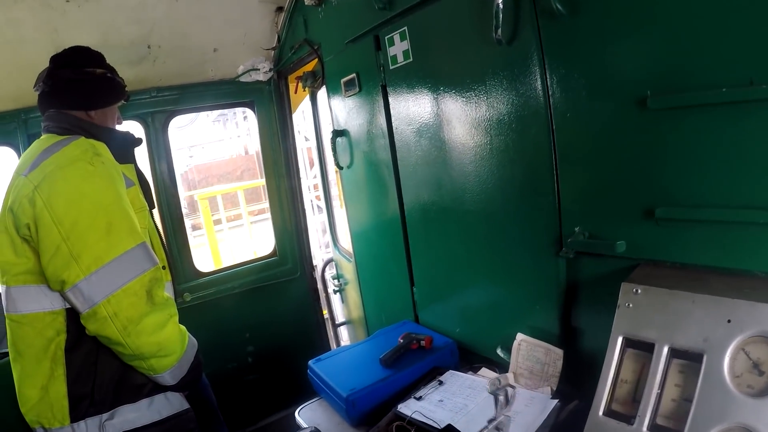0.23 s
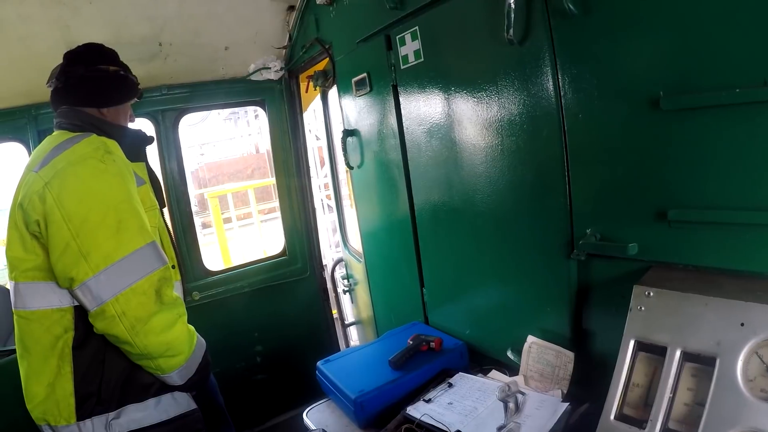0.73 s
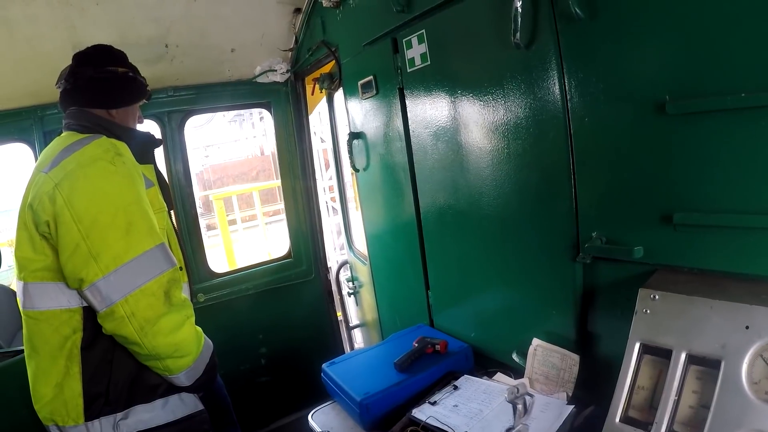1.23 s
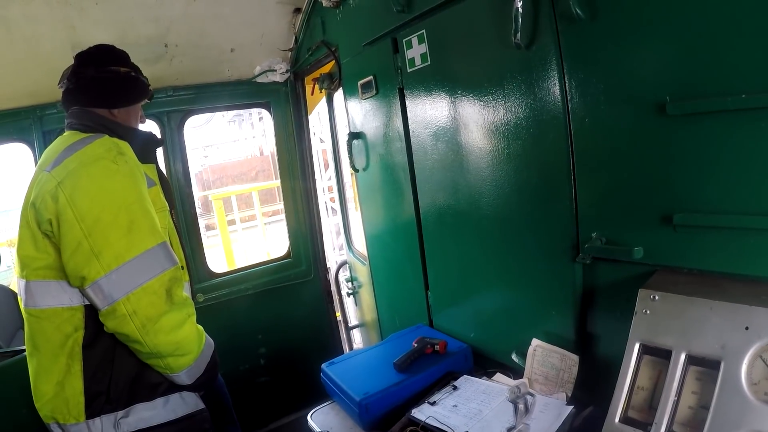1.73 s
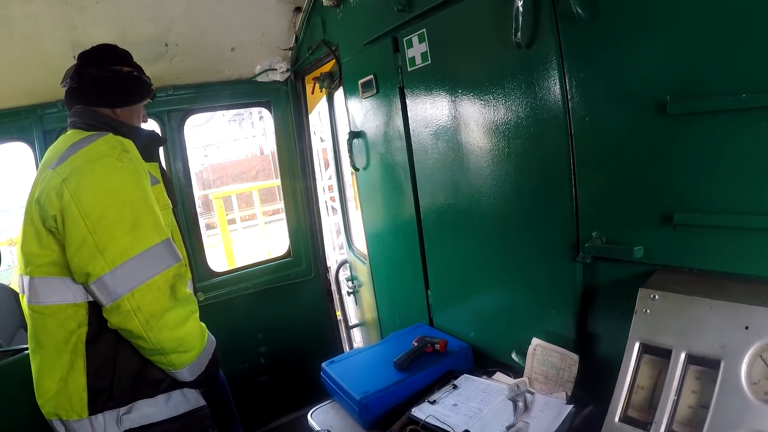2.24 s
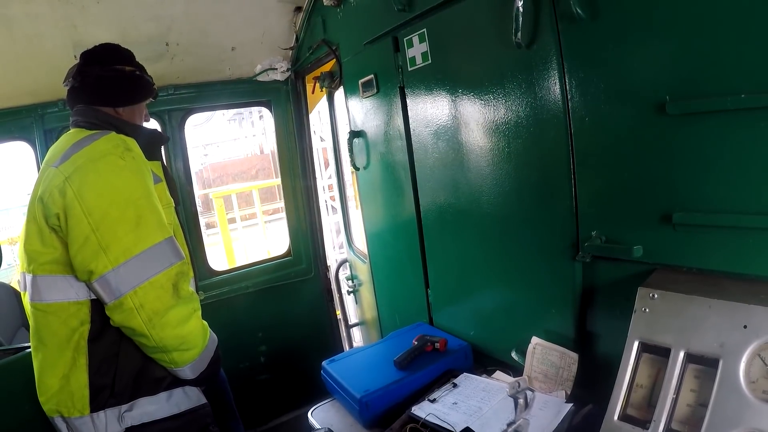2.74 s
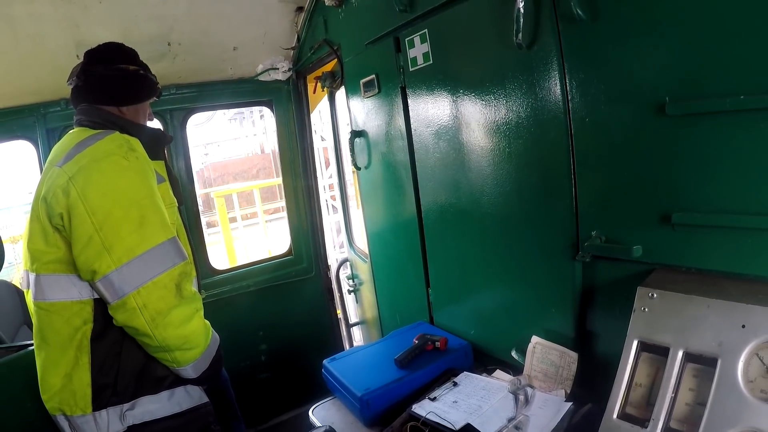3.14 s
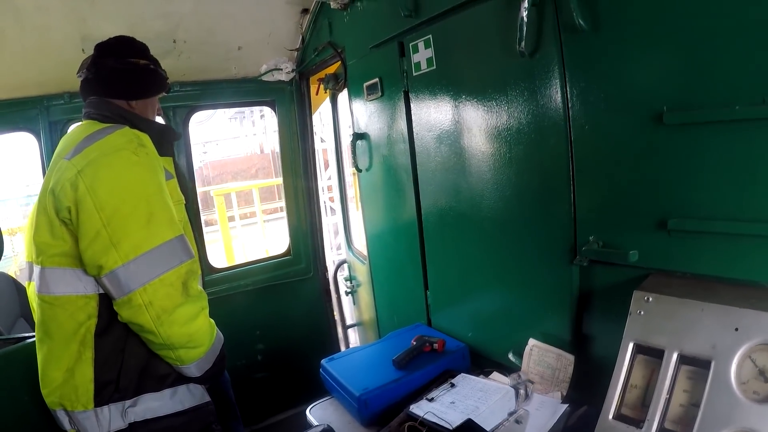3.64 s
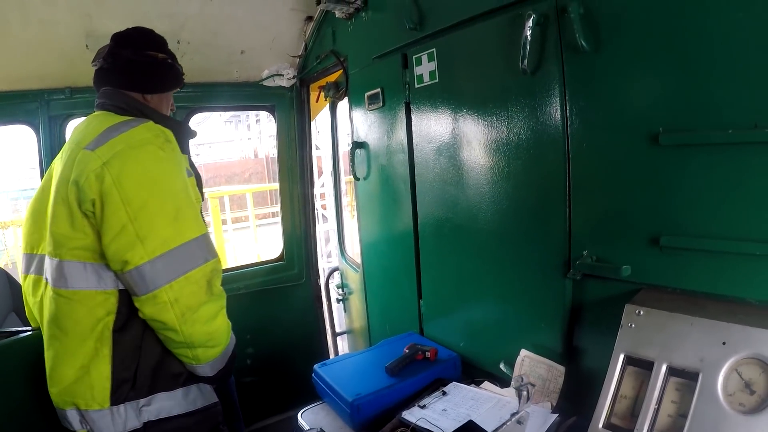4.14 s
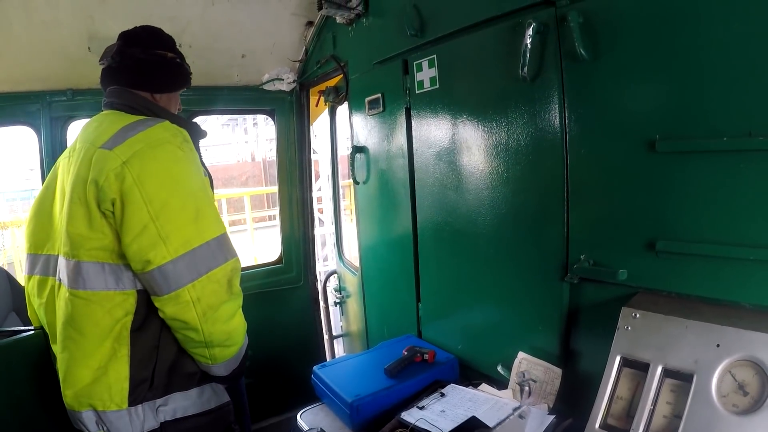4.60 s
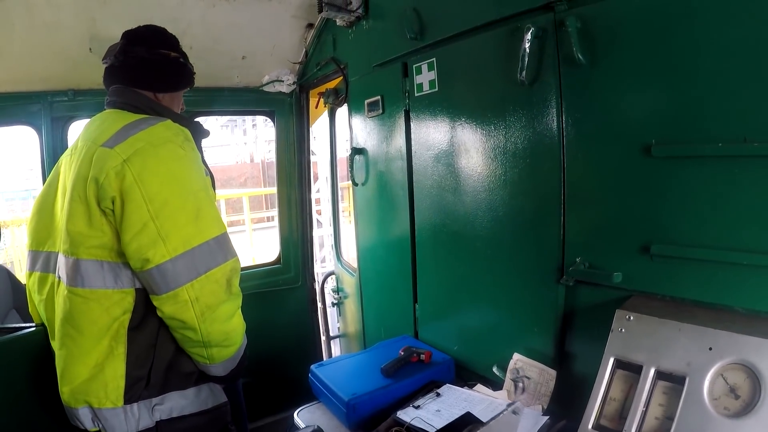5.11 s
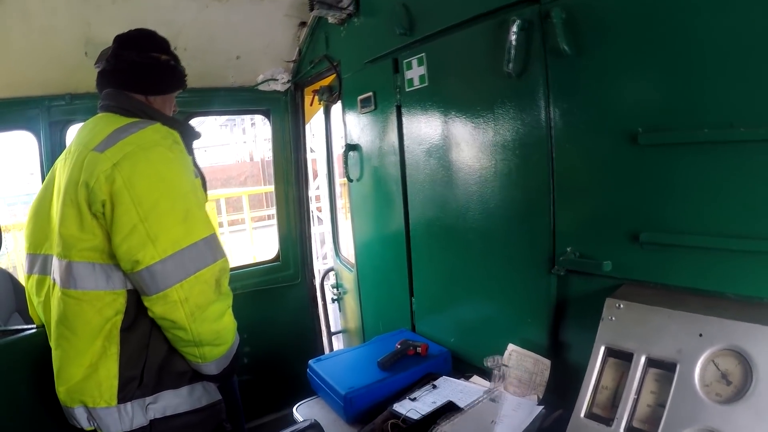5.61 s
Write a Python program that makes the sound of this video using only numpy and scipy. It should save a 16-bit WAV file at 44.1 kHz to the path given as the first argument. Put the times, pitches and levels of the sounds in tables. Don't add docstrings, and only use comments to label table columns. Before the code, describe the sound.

Inside a closed steel locomotive cab, a big diesel idles continuously with a deep, uneven throb. A faster pump pulse beats through it, valve gear clatters, and loose fittings buzz in rapid flutter over a steady hiss. Near the end come a couple of faint metal ticks and a sharper latch snap. Close, boxy stereo sound from a small camera.

```python
import sys
import numpy as np
from scipy import signal
from scipy.fft import rfft, irfft
from scipy.io import wavfile
from scipy.ndimage import uniform_filter1d

SR = 44100
rng = np.random.default_rng(int(sys.argv[2]) if len(sys.argv) > 2 else 0)


def makeup_ratio(level_db):
    decades = np.asarray(level_db, float) / 20
    return 10 ** decades


def waveform_to_disk(signal):
    frames = np.transpose(np.atleast_2d(signal))
    scaled = np.clip(frames, -1, 1) * 32767
    samples = np.round(scaled).astype(np.int16)
    wavfile.write(sys.argv[1], SR, samples)


N = 258426
T = np.arange(N) / SR
HZ = np.arange(N // 2 + 1) * SR / N + 1e-3

CYCLE_HZ = 3.1078
PUMP_HZ = 26.686


CYLINDERS = [
    (.1284, .591),
    (.2919, 1.29),
    (.4608, 1.455),
    (.636, 1.225),
    (.7933, .416),
    (.9547, .983),
]
# (frequency [Hz], width [Hz], share [ratio])
FRAME_MODES = [(20.74, 1.89, .031), (28.16, 1.95, .069), (45.01, 8.055, .9609), (45.03, 8.923, -.8808),
               (65.3, 4, .0089), (76.62, 2.07, .034), (94.6, 2, .012), (114, 7.7, .0053)]


def firing_throb(turns, count=43):
    thrust_db, mount_hz, uneven_hz = -37.5, 66, 66
    orders = {}
    for k in range(len(CYLINDERS), count):
        push = abs(sum(size * np.exp(-2j * np.pi * k * place) for place, size in CYLINDERS))
        loss = 1 + (k * CYCLE_HZ / mount_hz) ** 4
        if k % len(CYLINDERS):
            loss *= 1 + (k * CYCLE_HZ / uneven_hz) ** 12
        orders[k] = thrust_db + 20 * np.log10(push) - 10 * np.log10(loss)
    return throb(turns, CYCLE_HZ, orders, CYLINDERS, FRAME_MODES)


STROKES = [
    (.1245, -1.127),
    (.4064, -.274),
    (.6181, 1.059),
]
# (frequency [Hz], width [Hz], share [ratio])
PUMP_MODES = [(20.7, 49, .064), (299.5, 14.4, .53)]
PUMP_ORDERS = {1: -24, 2: -23, 3: -23, 4: -44, 5: -28, 6: -31, 7: -46, 9: -34, 12: -37, 13: -40}


def pump_throb():
    turns = PUMP_HZ * T + .004 * walk(1.5)
    return throb(turns, PUMP_HZ, PUMP_ORDERS, STROKES, PUMP_MODES)


GEAR_ORDERS = {13: -30, 15: -36, 21: -39, 25: -38, 60: -31, 90: -35, 100: -39, 707: -52}


def gear_lines(turns):
    return throb(turns, CYCLE_HZ, GEAR_ORDERS, CYLINDERS, FRAME_MODES)


HUM_ORDERS = {176: -40, 184: -32, 187: -41, 191: -42, 199: -36, 208: -43, 235: -47}


def bulkhead_hum(turns, depth=.9):
    swell = 1 + depth * np.cos(2 * np.pi * (turns - .47))
    return swell * throb(turns, CYCLE_HZ, HUM_ORDERS, CYLINDERS, FRAME_MODES)


def throb(turns, hz, orders, pushes, modes):
    out = 0
    for k, db in orders.items():
        line_hz = k * hz
        push = sum(size * np.exp(-2j * np.pi * k * place) for place, size in pushes)
        path = sum(share / (1 + 1j * (line_hz / f - f / line_hz) * f / width) for f, width, share in modes)
        phase = np.angle(push * path)
        out = out + np.sqrt(2) * makeup_ratio(db) * np.cos(2 * np.pi * k * turns + phase)
    return out


# (frequency [Hz], level per Hz [dB])
ROAR = [(12, -63), (25, -46), (60, -43), (130, -43), (220, -46), (340, -49), (520, -49.5), (680, -53.5),
        (900, -56), (1300, -61.5), (1600, -67), (2300, -71.5), (4200, -78.5), (14000, -125)]
# (frequency [Hz], width [Hz], level over the roar [dB])
PANELS = [(103, 7.2, -7.5), (158, 23, 5), (240.2, 22, 7), (259.7, 10.5, -8), (277.4, 5, 7.5),
          (316.6, 30, 9), (430, 27, 5), (572.5, 30, 6.5), (618, 20, 7.5), (648, 10, 3.5), (787, 20, 4),
          (1018, 12, 5.5), (1383, 87, 6), (1830, 33, 5)]


def engine_roar(turns, repeat=.4, knock=.25, swell_db=.15):
    size = int(SR / CYCLE_HZ)
    clatter = rng.standard_normal((2, size))[:, (turns % 1 * size).astype(int)]
    fresh = rng.standard_normal((2, N))
    noise = np.sqrt(repeat) * clatter + np.sqrt(1 - repeat) * fresh

    place, strength = np.transpose(CYLINDERS)
    cycles = np.arange(20)[:, None]
    scatter_db = 1.5 * rng.standard_normal((len(cycles), len(place)))
    knock_db = 20 * np.log10(strength) + scatter_db
    knocks = bursts(turns, (cycles + place - .1).ravel(), knock_db.ravel(), .003, .02)
    gate = 1 + knock * knocks
    noise = noise * gate / np.sqrt(np.mean(gate ** 2)) * makeup_ratio(swell_db * walk(2.45))

    rings = sum(db / (1 + (2 * (HZ - hz) / width) ** 2) for hz, width, db in PANELS)
    return ports(*noise, curve(ROAR, 1) + rings + 10 * np.log10(SR / 2))


# (frequency [Hz], level per Hz [dB])
BUZZ = [(1500, -72), (2500, -78), (3500, -74.5), (4300, -80), (5300, -75), (6700, -71.5), (7700, -73),
        (8100, -79), (8800, -81.5), (10200, -85.5), (11000, -94.5), (12600, -95), (13300, -99),
        (14200, -106)]


def fittings_buzz(turns, still=.95, pump_db=4.8, sway_db=2.2, scatter_db=.6, grit_db=.9):
    places = (np.arange(120) + .72) / 6
    when = np.interp(places, turns, T)
    db = pump_db * np.cos(2 * np.pi * (PUMP_HZ * when - .08))
    db = db + sway_db * np.cos(2 * np.pi * (1.88 * when + .12))
    db = db + scatter_db * rng.standard_normal(len(places))
    gate = still + bursts(turns, places, db, .015, .016)
    gate = gate * makeup_ratio(grit_db * walk(300.))
    noise = rng.standard_normal((2, N)) * gate / np.sqrt(np.mean(gate ** 2))
    ripple_db = 1.2 * np.interp(HZ, np.arange(500) * 45., rng.standard_normal(500))
    return ports(*noise, curve(BUZZ, 1) + ripple_db + 10 * np.log10(SR / 2))


def bursts(turns, places, db, rise_s, fall_s):
    blows = np.zeros(N)
    inside = (places > turns[0]) & (places < turns[-1])
    blows[np.searchsorted(turns, places[inside])] = makeup_ratio(db[inside])
    t = T[:SR // 4]
    shape = np.exp(-t / fall_s) - np.exp(-t / rise_s)
    return signal.fftconvolve(blows, shape / shape.max())[:N]


# (time [s], ring level [dB], ring frequency [Hz], snap level [dB], snap frequency [Hz])
TICKS = [
    (4.207, -20, 1330, -50, 5000),
    (5.312, -24, 1450, -42, 3000),
    (5.706, -45, 1450, -35, 7600),
    (5.7314, -17, 1450, -22.5, 5300),
    (5.81, -20, 1350, -50, 5000),
]


def latch_ticks():
    out, t = np.zeros(N + SR), T[:2000]
    for s, ring_db, ring_hz, snap_db, snap_hz in TICKS:
        ring = makeup_ratio(ring_db) * np.sin(2 * np.pi * ring_hz * t)
        ring = ring * np.exp(-t / .006) * np.minimum(t / .0015, 1)
        snap = sum(np.sin(2 * np.pi * ratio * snap_hz * t) for ratio in (.88, .96, 1.06, 1.15, 1.27))
        snap = makeup_ratio(snap_db) * snap * np.exp(-t / .0022) * np.minimum(t / .0004, 1)
        start = int(s * SR)
        out[start:start + len(t)] += ring + snap
    return out[:N]


# (frequency [Hz], level [dB])
FAN = [(205.8, -30), (890.4, -45), (959.9, -47), (1110, -50)]


def fan_tones():
    out = 0
    for hz, db in FAN:
        turns = hz * T + .1 * walk(2.6)
        out = out + np.sqrt(2) * makeup_ratio(db) * np.sin(2 * np.pi * turns)
    return out


# (frequency [Hz], likeness [0-1], left lead [rad], left minus right [dB])
PORTS = [(60, 1., 0, -1.6), (550, .91, .1, -3.9), (1050, .64, 1.7, -.2), (1900, .45, 1.5, 1.),
         (2600, .55, -.1, 0), (4000, .92, 0, 0), (6800, .15, 2.2, -.3), (9500, .15, 3, -6)]


def ports(a, b, db):
    like = np.clip(curve(PORTS, 1), 0, 1)
    a, b = rfft(a), rfft(b)
    right = like * np.exp(-1j * curve(PORTS, 2)) * a + np.sqrt(1 - like ** 2) * b
    tilt = makeup_ratio(curve(PORTS, 3) / 2)
    return irfft(makeup_ratio(db) * np.array([a * tilt, right / tilt]), N)


def curve(table, col):
    table = np.array(table)
    return np.interp(np.log(HZ), np.log(table[:, 0]), table[:, col])


def walk(rate):
    k = int(SR / rate)
    held = np.repeat(rng.standard_normal(N // k + 1), k)
    return 1.3 * uniform_filter1d(uniform_filter1d(held, k), k)[:N]


def scene():
    turns = CYCLE_HZ * T + 6e-4 * ((T - 3.1) ** 2 - 1.3) + .0004 * walk(1.5)
    lines = firing_throb(turns) + pump_throb() + gear_lines(turns) + bulkhead_hum(turns) + fan_tones()
    return ports(lines, 0 * lines, 0) + engine_roar(turns) + fittings_buzz(turns) + latch_ticks()


def roll_off(x):
    return signal.sosfilt(signal.butter(12, 14250, fs=SR, output="sos"), x)


def record(dry):
    top = np.array([[.8], [1.]])
    rounded = dry / (1 + np.abs(dry / top) ** 4) ** .25
    return roll_off(rounded - .006)


dry = scene()
out = record(dry)
waveform_to_disk(out)
```